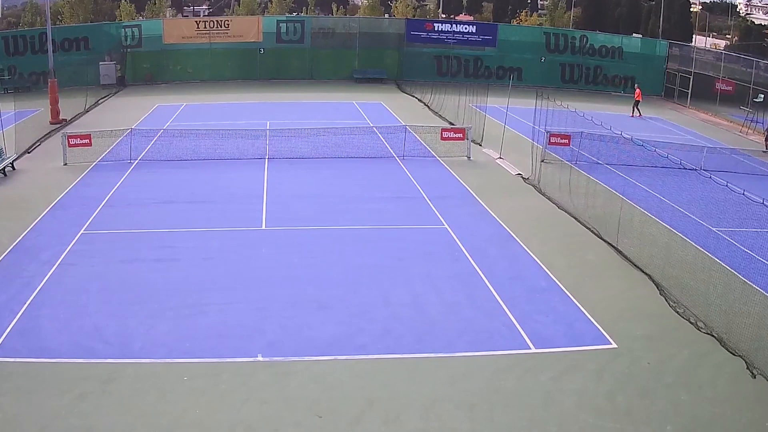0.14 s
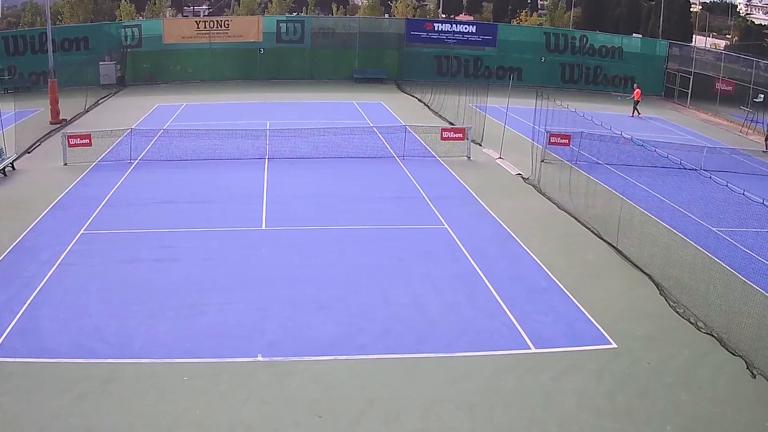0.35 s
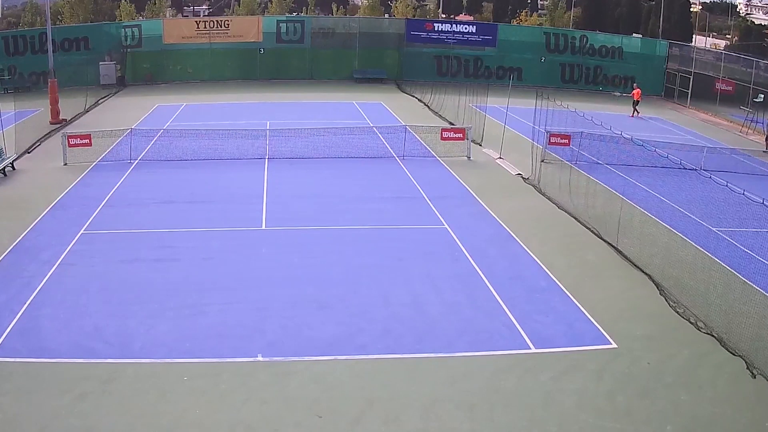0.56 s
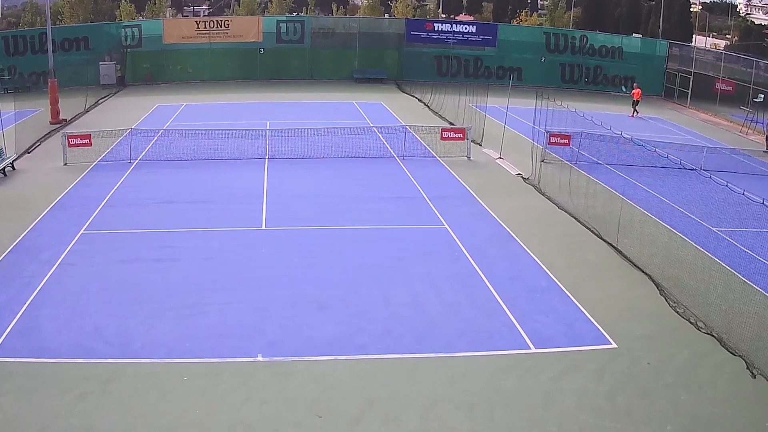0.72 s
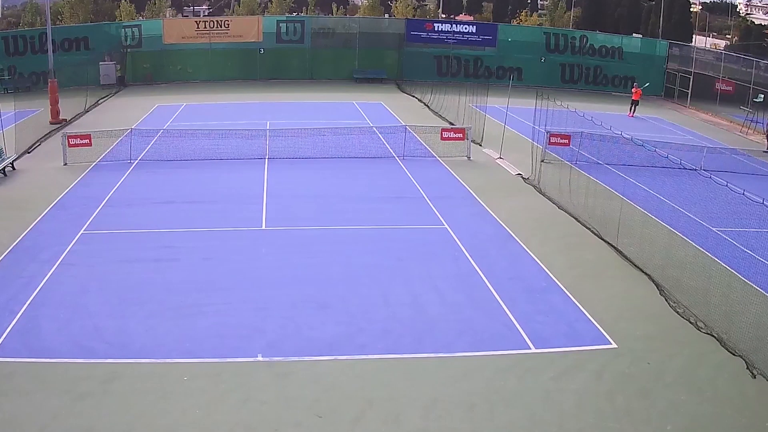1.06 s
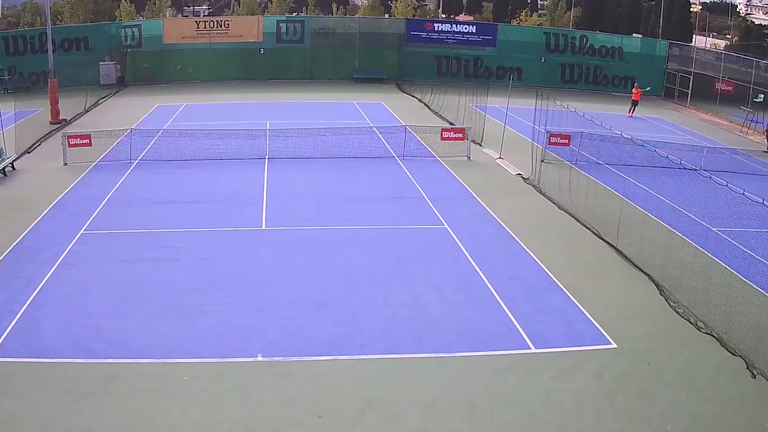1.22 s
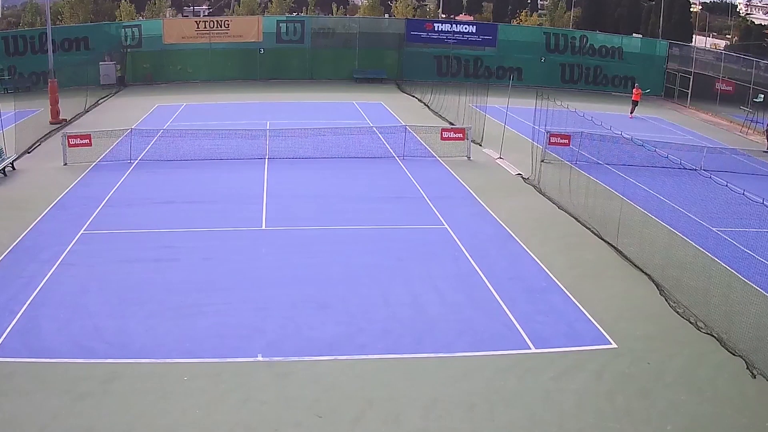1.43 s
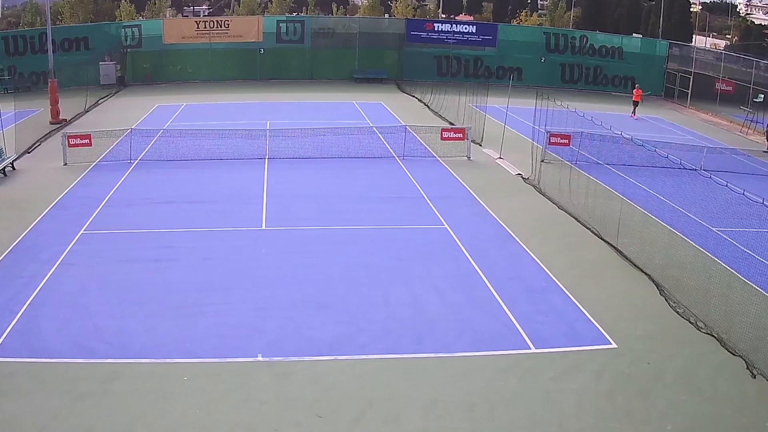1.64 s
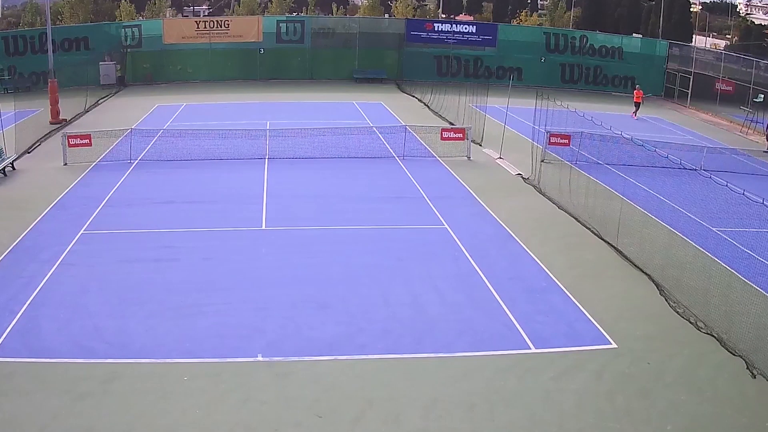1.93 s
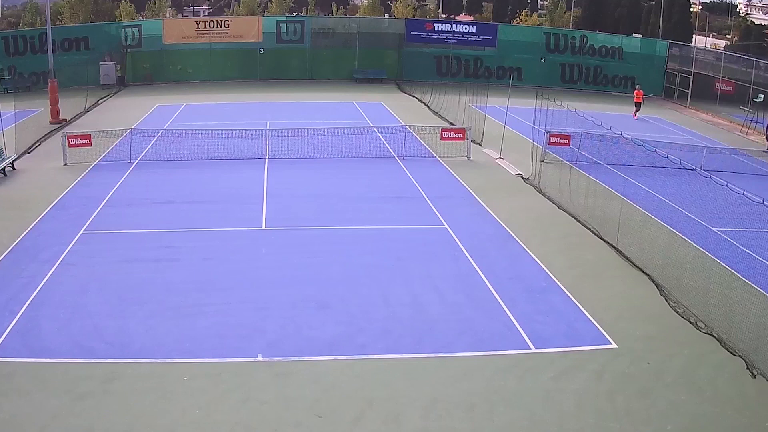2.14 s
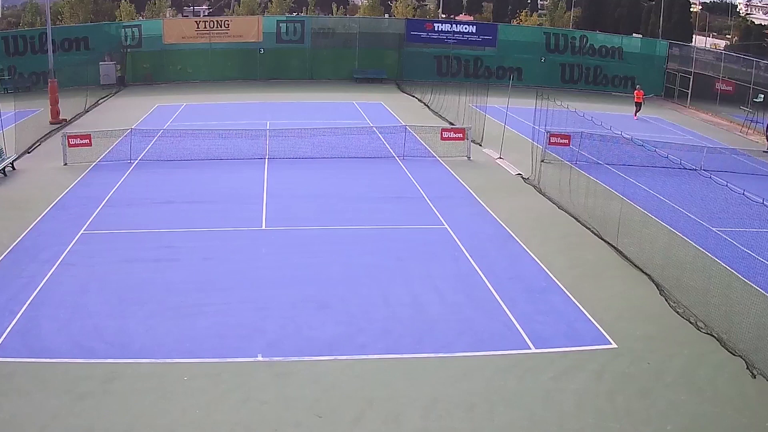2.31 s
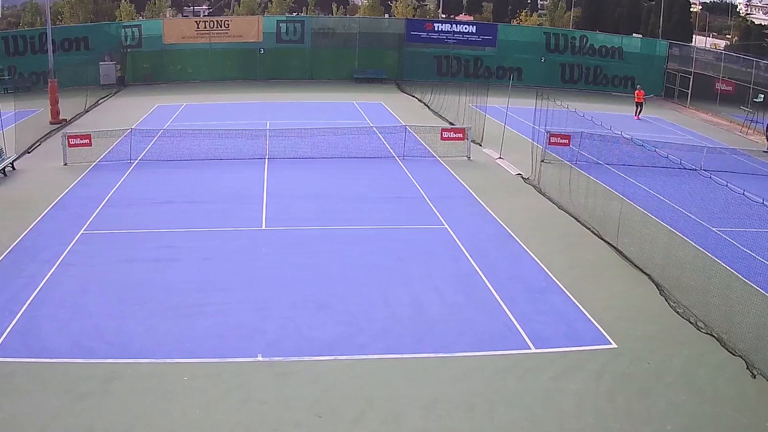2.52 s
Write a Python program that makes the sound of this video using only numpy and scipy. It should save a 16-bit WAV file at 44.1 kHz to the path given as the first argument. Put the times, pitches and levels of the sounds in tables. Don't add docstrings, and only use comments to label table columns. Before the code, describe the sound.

On an open hard court, a ball is struck sharply on the next court, slaps back off walls and fences, then far balls pop softly on the ground under constant wind rumble and road noise, through a coarse camera microphone.

```python
import sys
import numpy as np
from scipy import signal
from scipy.fft import rfft, irfft, dct, next_fast_len
from scipy.io import wavfile
from scipy.ndimage import uniform_filter1d, map_coordinates

SR = 44100
rng = np.random.default_rng(int(sys.argv[2]) if len(sys.argv) > 2 else 0)


def put_to_file(sound):
    columns = np.atleast_2d(sound).T
    safe = np.clip(columns, -1, 1)
    whole_steps = np.round(safe * 32767)
    wavfile.write(sys.argv[1], SR, whole_steps.astype(np.int16))


def volts_from_decibels(level):
    exponent = np.asarray(level, float) / 20
    return 10 ** exponent


N = 117747

CAMERA_HZ = 24000
LEAD = 2618


def unit(x):
    return x / np.sqrt(np.mean(x ** 2) + 1e-20)


def along(points, hz):
    f, v = np.transpose(points)
    return np.interp(np.log(hz + 1), np.log(f + 1), v)


def curve(rows):
    s, v = np.transpose(rows)
    return np.interp(np.arange(N) / SR, s, v)


def wobble(rate):
    knots = rng.standard_normal(int(N * 40 / SR) + 4)
    return map_coordinates(knots, [np.arange(N) * min(rate, 40) / SR])


def filtered(x, response):
    m = next_fast_len(N + SR // 2)
    return irfft(rfft(x, m) * response(np.fft.rfftfreq(m, 1 / SR)), m)[:N]


def shaped_noise(spectrum, x):
    return unit(filtered(x, lambda hz: volts_from_decibels(along(spectrum, hz))))


def rush(spectrum, patchy_db):
    z = signal.stft(rng.standard_normal(N + 512), nperseg=512)[2]
    field = uniform_filter1d(rng.standard_normal(z.shape), size=6, axis=0)
    field = uniform_filter1d(field, size=10, axis=1)
    x = signal.istft(z * volts_from_decibels(patchy_db * unit(field)), nperseg=512)[1][:N]
    return shaped_noise(spectrum, x)


def traffic(gust_db):
    # (time [s], level [dB])
    road_level = [(0.0, -45), (0.5, -45.5), (0.94, -44), (1.87, -45), (2.67, -45)]
    # (frequency [Hz], density [dB per Hz])
    road_tone = [(150, -20.5), (250, -2.5), (700, -4.5), (930, -6), (1450, -21), (2500, -35), (4000, -50),
                 (9000, -79)]
    level_db = curve(road_level) + 0.35 * wobble(9) + gust_db
    return volts_from_decibels(level_db) * rush(road_tone, patchy_db=0.6)


def wind(gust_db):
    # (time [s], level [dB])
    gust_level = [(0.0, -41.5), (0.43, -43), (0.49, -49), (0.53, -38), (0.57, -47), (0.65, -42),
                  (0.85, -45.5), (0.86, -39), (1.04, -43.5), (1.4, -41), (1.46, -44.5), (1.64, -42),
                  (1.73, -45), (2.07, -42), (2.19, -45), (2.57, -44.5), (2.62, -42.5), (2.67, -37)]
    # (frequency [Hz], density [dB per Hz])
    rumble_tone = [(9, -33), (15, -11.5), (54, 0), (104, -0.5), (190, -0.5), (400, -15), (520, -36.5),
                   (880, -120)]
    level_db = curve(gust_level) + 0.27 * wobble(14) + 0.52 * gust_db
    return volts_from_decibels(level_db) * rush(rumble_tone, patchy_db=0.18)


def leaves():
    # (frequency [Hz], density [dB per Hz])
    hiss_tone = [(800, -27), (2000, -1), (3500, -3.5), (6500, -12.5), (9000, -17.5)]
    return volts_from_decibels(-75 + .3 * wobble(3)) * rush(hiss_tone, patchy_db=0.0)


def swell(t, peak_s):
    return t / peak_s * np.exp(1 - t / peak_s)


def contact(t, held_s):
    rise_s, release_t60_s = .001, .02
    rise = 1 - np.exp(-(t / rise_s) ** 2)
    return rise * volts_from_decibels(-60 * np.maximum(t - held_s, 0) / release_t60_s)


def reflected(x):
    # (delay [s], level [dB], dull above [Hz], thin below [Hz])
    returns = [(0.013, -14.5, 5530, 50), (.02, -11, 1500, 50), (.046, -18, 7000, 2500),
               (0.055, -18, 7000, 2500), (.066, -19, 7000, 2500), (0.086, -16, 7000, 2000),
               (.099, -16, 2000, 50), (0.1866, -2, 5500, 3950), (.192, -8, 6000, 5000)]

    def paths(f):
        total = 1
        for delay_s, db, dull_hz, thin_hz in returns:
            delay = np.exp(-2j * np.pi * f * delay_s)
            thinning = (f / (f - 1j * thin_hz)) ** 2
            total = total + volts_from_decibels(db) * delay / (1 + 1j * f / dull_hz) ** 4 * thinning
        return total

    return filtered(x, paths)


def stroke():
    # (frequency [Hz], level [dB], held [s])
    modes = [(140, -2.5, .007), (816, -4.5, .008), (973, 1, .008), (1276, -3.5, .008), (1560, -12.5, .006),
             (1860, -11.5, .008), (2231, -8.5, 0.0071), (2835, -15.5, .006), (3158, -11, 0.0054),
             (3870, -20.5, 0.0054), (4204, -20, .006), (5240, -24.5, .006), (6290, -25.5, 0.0049),
             (7370, -29, 0.0074)]
    # (frequency [Hz], level [dB])
    snap_tone = [(150, -6), (1000, -4), (2000, -7), (3200, -6), (3600, -17), (5000, -16), (6300, -21),
                 (7500, -30)]
    # (frequency [Hz], level [dB])
    knock_tone = [(300, -30), (600, 0), (1000, -2), (1700, -16), (3000, -24), (4500, -36)]
    stroke_s, stroke_db = .5289, -38
    snap_db, knock_db = -6, -5
    t = np.maximum(np.arange(N) / SR - stroke_s, 0)
    ring = np.zeros(N)
    for hz, db, held_s in modes:
        ring += volts_from_decibels(db) * np.sin(2 * np.pi * hz * t) * contact(t, held_s)
    snap = shaped_noise(snap_tone, rng.standard_normal(N)) * contact(t, .005)
    knock = shaped_noise(knock_tone, rng.standard_normal(N)) * swell(t, .011)
    direct = volts_from_decibels(stroke_db) * (ring + volts_from_decibels(snap_db) * snap)
    return reflected(direct) + volts_from_decibels(stroke_db + knock_db) * knock, direct


def scatter(x):
    # (frequency [Hz], decay by 60 dB [s])
    decay = [(500, .9), (2000, .9), (4000, .7), (6500, .45)]
    wait_s, rise_s = .02, .02
    hz, t, z = signal.stft(rng.standard_normal(SR), SR, nperseg=256)
    fall = volts_from_decibels(-60 * t / along(decay, hz)[:, None])
    tail = signal.istft(z * fall * (1 - np.exp(-t / rise_s)), SR, nperseg=256)[1]
    delayed = np.pad(x, (round(wait_s * SR), 0))
    return signal.fftconvolve(delayed, tail / np.linalg.norm(tail))[:N]


def bounces():
    # (time [s], peak level [dB])
    landings = [
        (.8605, -39),
        (1.1330, -34),
        (1.5760, -35),
        (1.7528, -33),
    ]
    # (centre [Hz], width [Hz], level [dB])
    cavity = [(400, 400, -4), (880, 450, 0)]
    push_db, skid_db, skid_swell_s = 30, -13.5 - 10.5, .004
    contact_hz = 1900
    felt, t = rng.standard_normal(N), np.arange(N) / SR
    blows = np.zeros(N)
    for s, db in landings:
        push = np.arange(N) == round(s * SR)
        skid = felt * swell(np.maximum(t - s, 0), skid_swell_s)
        blows += volts_from_decibels(db + push_db) * (push + volts_from_decibels(skid_db) * skid)

    def ball(f):
        modes = 0
        for hz, width, db in cavity:
            modes = modes + volts_from_decibels(db) * 1j * f * width / (hz * hz - f * f + 1j * f * width)
        return modes / (1 + 1j * f / contact_hz) ** 4

    return filtered(blows, ball)


def blocks(v, size, shift, alpha, top_hz, db):
    # (frequency [Hz], step [dB])
    step_curve = [(100, -52), (1000, -57), (1800, -60), (3500, -63), (5000, -65), (6700, -69)]
    mask_db, mask_hz = 0, 4800
    count = (len(v) - shift) // size - 1
    at = shift + size * np.arange(count)[:, None] + np.arange(2 * size)
    window = signal.windows.kaiser_bessel_derived(2 * size, alpha * np.pi)
    a, b, c, d = np.split(v[at] * window, 4, axis=1)
    lines = dct(np.hstack([-c[:, ::-1] - d, a - b[:, ::-1]]), 4, axis=1, norm="ortho")
    hz = (np.arange(size) + .5) * CAMERA_HZ / (2 * size)
    near = np.sqrt(abs(uniform_filter1d(lines ** 2, size=8, axis=1)))
    step = np.maximum(volts_from_decibels(along(step_curve, hz) + db), volts_from_decibels(mask_db) * near * (hz > mask_hz))
    whole = np.floor(abs(lines / step) ** .75 + .4054)
    start_s = at[:, :1] / CAMERA_HZ - LEAD / SR
    lines = np.sign(lines) * whole ** (4 / 3) * step * (hz < top_hz(start_s))
    p, q = np.split(dct(lines, 4, axis=1, norm="ortho"), 2, axis=1)
    back = np.hstack([q, -q[:, ::-1], -p[:, ::-1], -p]) * window
    return np.bincount(at.ravel(), back.ravel(), len(v))


def camera(x):
    short_from_s, short_to_s, switch_s = .5167, .5593, .004

    def long_top(s):
        return 6750

    def short_top(s):
        return np.where((s > .524) & (s < .531), 7500, 4600)

    v = signal.resample_poly(np.pad(x, (LEAD, 2 * LEAD), "reflect"), 80, 147)
    slow = blocks(v, 1024, 0, 4, long_top, db=0)
    fast = blocks(v, 128, 64, 1.5, short_top, db=3.5)
    t = np.arange(len(v)) / CAMERA_HZ - LEAD / SR
    inside_s = np.minimum(t - short_from_s, short_to_s - t)
    share = np.clip(inside_s / switch_s + .5, 0, 1)
    return signal.resample_poly(slow + share * (fast - slow), 147, 80)[LEAD:LEAD + N]


def scene():
    gust_db = 0.95 * wobble(30)
    background = traffic(gust_db) + wind(gust_db) + leaves()
    heard, direct = stroke()
    far = bounces()
    diffuse = volts_from_decibels(-16.5) * scatter(direct + far)
    return (background + heard + far + diffuse)[None]


def low_pass(x):
    return signal.sosfilt(signal.butter(12, 7560, fs=SR, output="sos"), x)


def record(dry):
    mix = camera(dry[0])[None]
    return low_pass(mix)


dry = scene()
out = record(dry)
put_to_file(out)
```